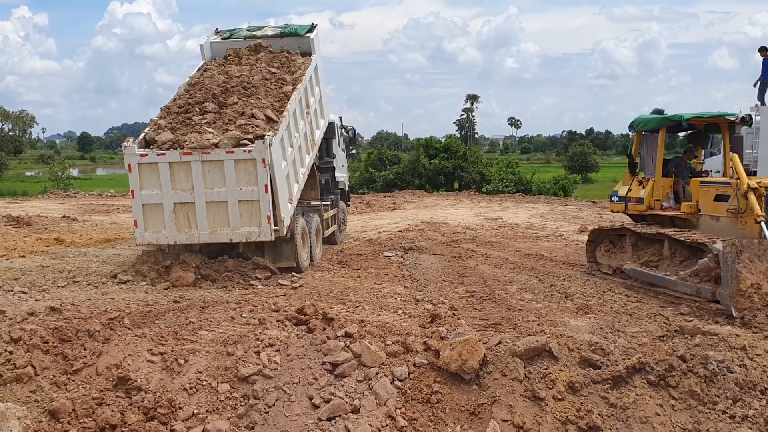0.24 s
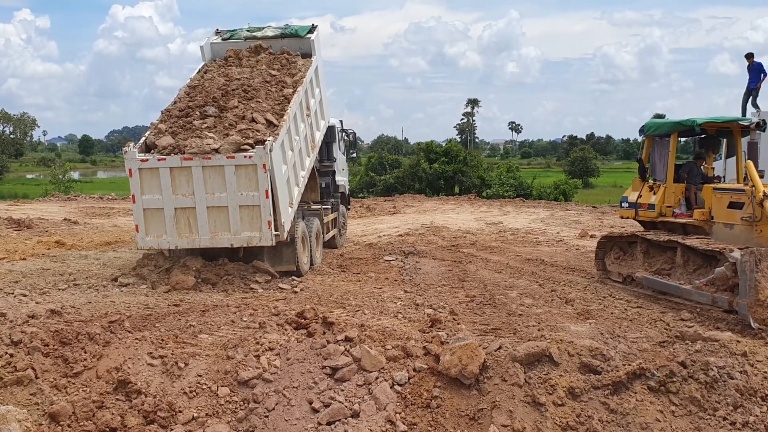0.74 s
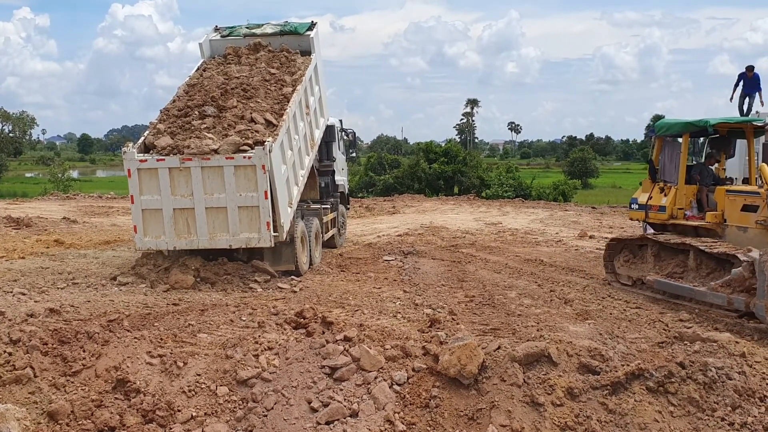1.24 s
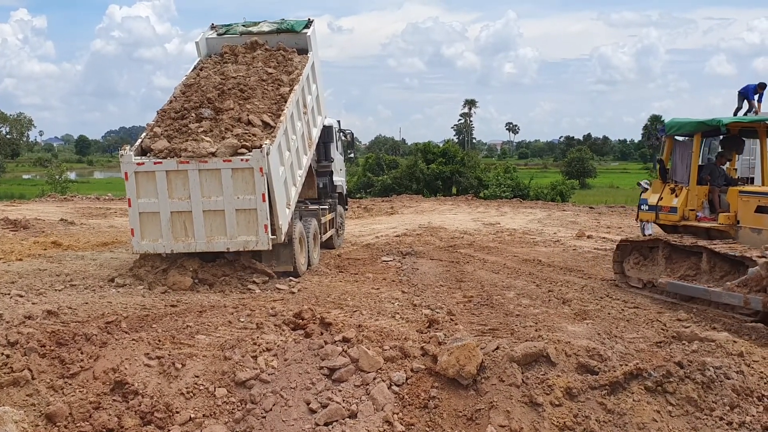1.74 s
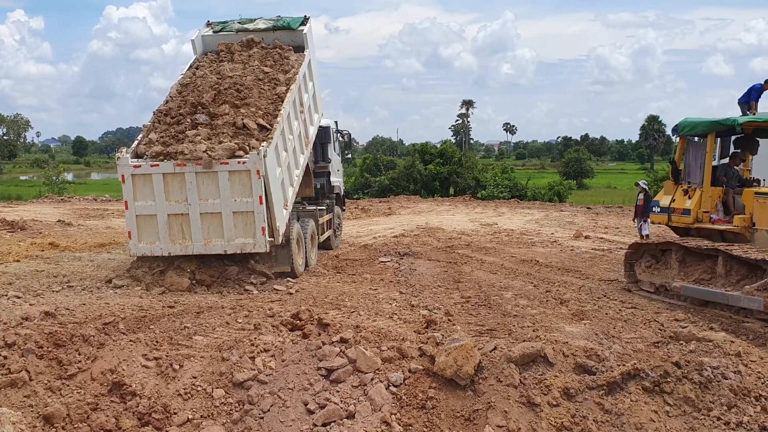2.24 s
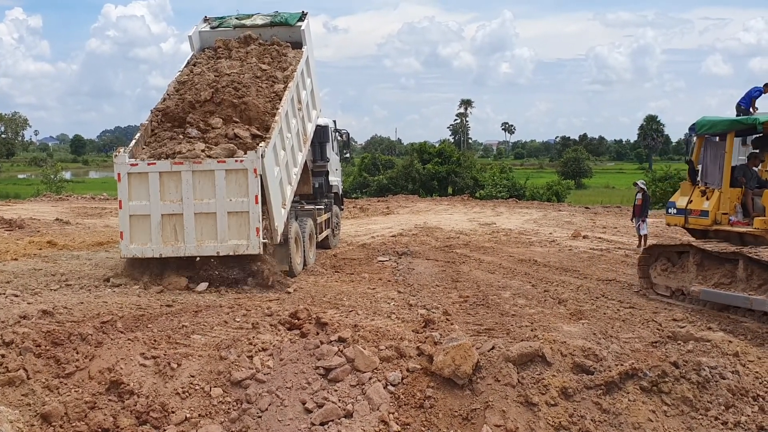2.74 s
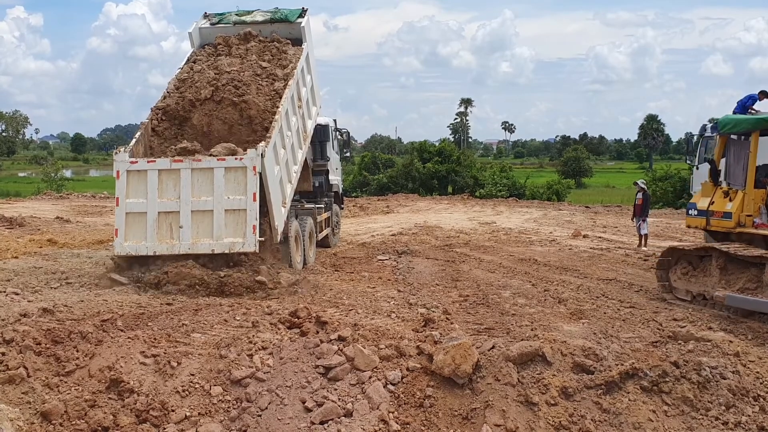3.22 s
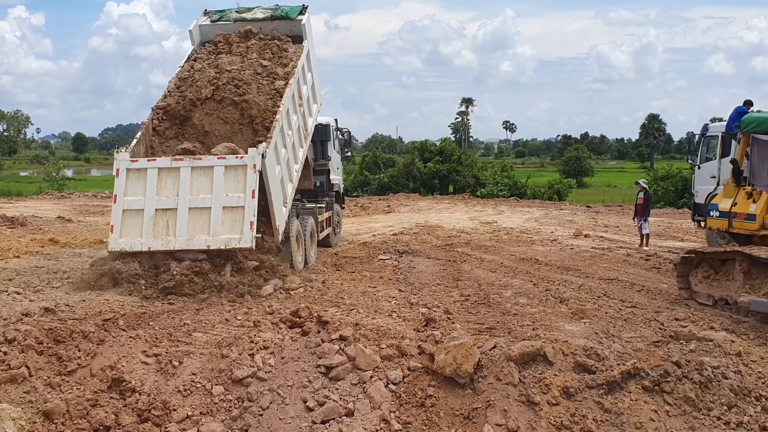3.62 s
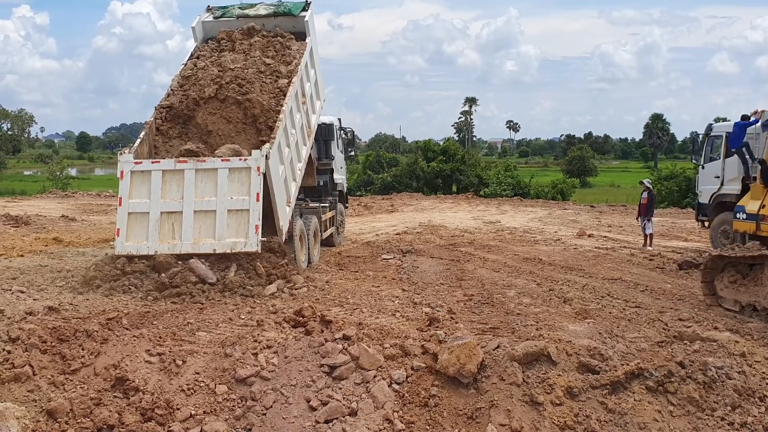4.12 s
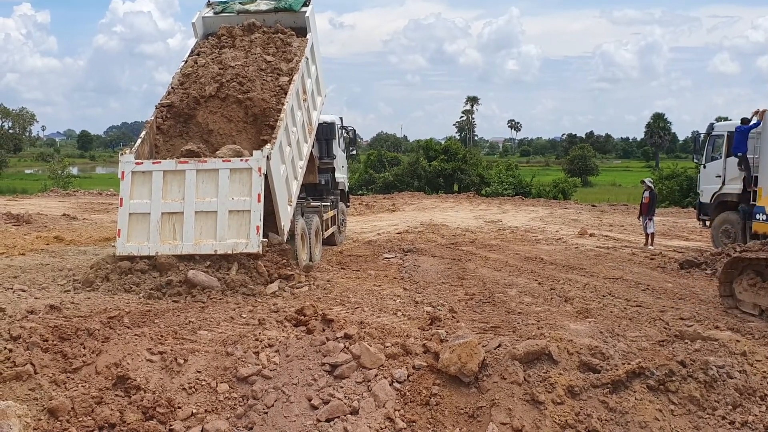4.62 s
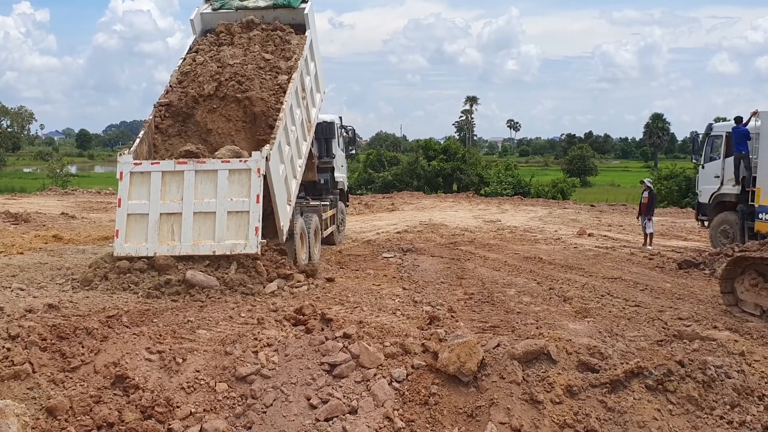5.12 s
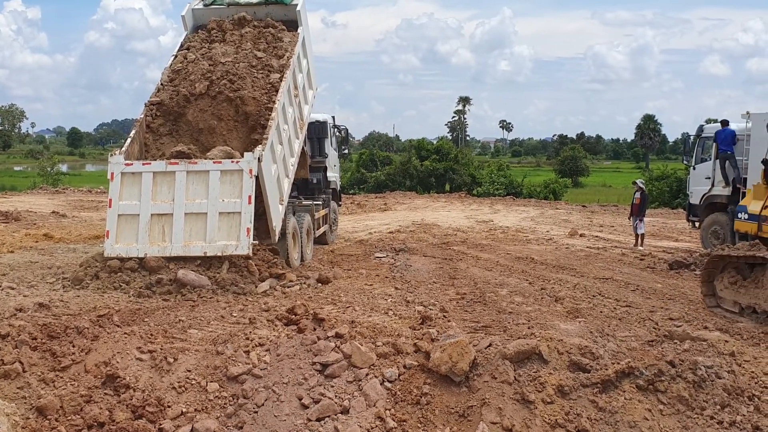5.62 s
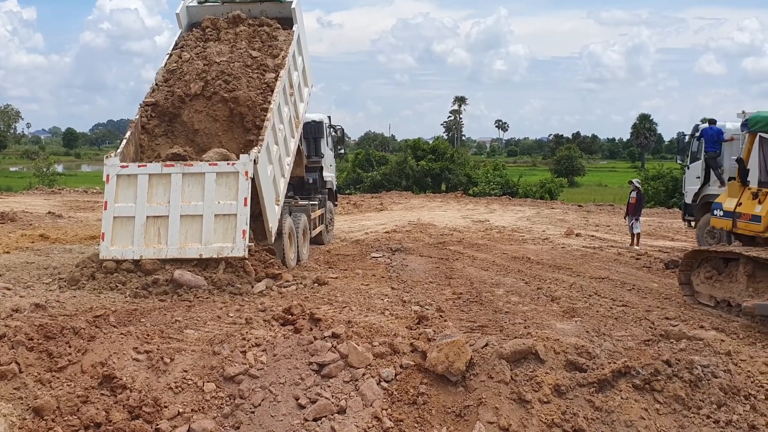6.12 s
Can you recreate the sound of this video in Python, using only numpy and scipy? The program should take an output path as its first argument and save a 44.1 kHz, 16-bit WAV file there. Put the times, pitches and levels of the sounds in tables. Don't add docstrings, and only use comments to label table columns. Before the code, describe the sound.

Heavy crawler engine throbs close by at an open earth site, sagging midway before surging back, with steel tracks clanking, squeaking and finally banging.

```python
import sys
import numpy as np
from scipy import signal
from scipy.fft import rfft, irfft, next_fast_len
from scipy.io import wavfile
from scipy.ndimage import uniform_filter1d, map_coordinates

SR = 44100
rng = np.random.default_rng(int(sys.argv[2]) if len(sys.argv) > 2 else 0)


def voltage_ratio(level):
    return 10 ** (np.asarray(level, float) / 20)


def store_wav(level_fs):
    pcm = np.round(np.clip(np.atleast_2d(level_fs), -1, 1) * 32767)
    wavfile.write(sys.argv[1], SR, pcm.T.astype(np.int16))


N = 280476
T = np.arange(N) / SR

# pitch_hz,
# level_db, waver_hz
STEADY_LINES = [(35, -41, .3), (103.6, -51.5, 0.42), (233.2, -40.5, 2.27), (384.6, -43, 4.88),
                (569, -45, 8.1), (1322, -52, 6), (1918, -54.5, 9.3), (3040, -55, 12)]
# centre_s, level_db, length_s
COAST_LOPE = [
    (3.58, -24, .08),
    (3.65, -24, .07),
    (3.73, -24, .09),
    (3.81, -25, .1),
    (3.91, -26, .1),
    (3.98, -22, .09),
    (4.145, -22, .09),
    (4.28, -23, .08),
]
# frequency_hz, density_db
SITE_RUMBLE = [(12, -58.5), (28, -9), (42, -4), (58, -3), (81, 5.5), (118, 0), (197, 1), (221, -18),
               (271, -1), (300, -3.5), (390, -48), (660, -120)]

# [resonance_hz, width_hz, gain_db]
SCRAPES = [
    (2.718, .05, -26.5, [(3000, 500, 0), (2000, 500, -1), (1100, 400, -1), (4800, 2200, -8), (9500, 5000, -16)]),
    (2.722, .034, -31, [(7000, 250, 0)]),
    (2.732, .036, -33, [(6250, 350, 0), (10150, 300, -8)]),
    (2.107, .02, -36, [(2900, 600, 0), (5500, 3000, -5)]),
    (5.98, .05, -46, [(6800, 1600, 0), (9500, 3000, -3), (11700, 150, 7)]),
    (5.937, .007, -31, [(900, 300, 0), (1650, 400, 0), (2200, 500, -2)]),
    (1.881, .004, -42, [(12000, 5000, 0)]),
    (6.117, .007, -30, [(1200, 900, 0), (2300, 1200, -1), (3400, 600, -5)]),
]
# start_s, peak_db, pitch_hz, t60_s
CLANKS = [(0.662, -29, 1250, 0.068), (0.461, -18, 1350, .05), (0.742, -19, 1320, .05),
          (0.829, -13, 875, 0.045), (1.043, -25, 1216, .05), (1.259, -24, 927, .05),
          (1.438, -25, 1094, 0.06), (1.784, -21, 1330, .05), (2.396, -19, 919, 0.052),
          (2.885, -24, 1902, 0.044), (3.25, -20, 1700, .05), (4.62, -19, 1150, 0.058),
          (1.673, -16, 1253, 0.076), (2.112, -16, 821, 0.041), (2.208, -13.5, 1200, 0.062),
          (2.588, -19, 1588, 0.16), (3.17, -13, 1238, 0.047), (3.467, -14, 1251, 0.059),
          (3.612, -16, 1220, 0.057), (3.766, -16, 920, 0.032), (4.004, -15, 980, 0.06),
          (4.233, -15, 771, 0.045), (3.686, -16, 790, 0.043), (1.014, -23, 850, .04)]
# start_s, peak_db, pitch_hz, t60_s
BANGS = [
    (5.9392, -11, 930, .04),
    (5.9388, -13, 1650, .02),
    (5.9385, -16, 2150, .015),
    (6.1175, -11, 1080, .045),
    (6.117, -10, 2200, .016),
    (6.1172, -13, 1750, .018),
    (6.116, -18, 3300, .012),
    (6.122, -16, 750, .03),
    (6.131, -15, 1075, .05),
]
# frequency_hz, width_hz, gain_db
SHOE_MODES = [(950, 420, -1), (1600, 600, -1), (2200, 550, -1), (3300, 900, -16)]

# start_s, end_s, start_hz, end_hz, level_db
SQUEALS = [(2.11, 2.18, 7900, 8050, -47), (2.127, 2.148, 8000, 8020, -40.5),
           (2.144, 2.168, 8000, 8040, -40), (2.266, 2.31, 3880, 3930, -41), (2.3, 2.325, 4050, 4150, -45),
           (2.385, 2.425, 3875, 3890, -46), (2.47, 2.535, 3930, 3950, -43.5),
           (2.74, 2.775, 7850, 8000, -49), (2.774, 2.8, 7985, 8020, -40), (2.797, 2.815, 8020, 8030, -41),
           (2.81, 2.835, 8030, 8040, -46), (4.397, 5.99, 8800, 9035, -66), (2.89, 2.93, 4000, 4000, -46),
           (3.16, 3.245, 3980, 3990, -42), (4.66, 4.765, 4000, 4028, -46), (4.775, 4.83, 3960, 3930, -44),
           (5.915, 5.945, 3875, 3870, -41), (5.658, 5.69, 7970, 7960, -46), (5.99, 6.03, 11700, 11680, -46)]
# start_s, end_s, start_hz, end_hz, level_db
GROANS = [(0.84, 1.26, 324, 310, -34), (2.44, 2.7, 240, 247, -28.5), (3.6, 3.7, 85, 118, -29),
          (3.82, 3.95, 105, 88, -28.5), (5.2, 5.78, 280, 298, -35), (1.58, 2.08, 337, 315, -32),
          (3.69, 3.8, 296, 302, -33), (2.38, 2.72, 327.2, 340, -28), (2.93, 3.17, 582, 640, -33.5),
          (2.74, 2.88, 333, 329, -28), (3.45, 3.61, 356, 332, -27), (3.95, 4.13, 281, 258, -28),
          (4.5, 4.71, 298, 301, -30), (4.757, 4.9, 272, 270, -28), (5.25, 6.404, 377, 390, -36)]
# start_s, end_s, start_hz, end_hz, level_db
PINGS = [(3.522, 3.547, 1320, 1320, -29.5), (4.165, 4.214, 1325, 1320, -37), (4.235, 4.27, 1180, 1210, -36),
         (4.495, 4.543, 1170, 1191, -38), (4.589, 4.633, 1310, 1320, -36), (4.732, 4.76, 1330, 1323, -43),
         (4.888, 4.93, 1830, 1817, -41), (6.003, 6.05, 1320, 1330, -36.5), (6.058, 6.09, 1300, 1320, -37),
         (6.114, 6.15, 1325, 1334, -43), (6.135, 6.175, 1900, 1880, -39), (6.24, 6.29, 1330, 1300, -37),
         (6.291, 6.34, 1860, 1880, -41), (1.52, 1.554, 1320, 1320, -32)]
# time_s, pitch_hz, level_db
DRAGS = [
    [(4.162, 3987, -58), (4.176, 3987, -44), (4.25, 3957, -43), (4.262, 4085, -46), (4.294, 3998, -37),
     (4.308, 4000, -46), (4.33, 3980, -38), (4.4, 4030, -50), (4.42, 4030, -60)],
    [(4.44, 4005, -58), (4.465, 4015, -50), (4.485, 4008, -38), (4.545, 3986, -42), (4.56, 3975, -52),
     (4.599, 3995, -40), (4.625, 3993, -47), (4.64, 3993, -58)],
    [(5.696, 3880, -58), (5.708, 3874, -39), (5.768, 3858, -34), (5.78, 3834, -38), (5.846, 3844, -40),
     (5.86, 3830, -56)],
    [(5.968, 3880, -52), (5.981, 3885, -32), (6.059, 3895, -35), (6.077, 3898, -44), (6.133, 3928, -37),
     (6.15, 3885, -35), (6.173, 3859, -31), (6.195, 3880, -37), (6.222, 3903, -44)],
    [(6.218, 3900, -46), (6.232, 3887, -36), (6.262, 3878, -36), (6.282, 3852, -44), (6.292, 3817, -35),
     (6.336, 3835, -32), (6.37, 3842, -35)],
]

# level_db, lost_when_away_db, lost_without_fuel_db,
# rise_db_per_hz of firing rate, share_of_jolt
LAYERS = dict(roar=(-25, 1.5, 0, 0.1448, 0.1037), knock=(-31.5, 6.5, -2.5, 0.25, -0.1),
          fan=(-34, 0.5, 2, 0.0557, 0), rattle=(-41, 8.5, 0.5, 0.07, 0.43), air=(-45, 3.5, 1.5, 0, 0.41))
# time_s, share (0-1)
AWAY = [(0, 0), (2.45, 0.2), (2.85, 0.45), (3.4, 0.65), (3.65, 0.99), (4.7, 0.35), (5.0, 0.4), (5.35, 0.76),
        (6.36, 0.82)]
# centre_s, jolt_db, length_s
JOLTS = [(.04, -9, 0.12), (.2, 3.5, 0.22), (.52, 6, 0.2), (.78, 6, 0.18), (1.09, 8, 0.25), (1.3, 6, 0.26),
         (1.6, 5, 0.23), (1.76, 10, 0.12), (1.93, 5, 0.15), (2.15, 8, .1), (2.35, 8, 0.36), (2.62, 3, 0.14),
         (3.03, 8, 0.073), (3.2, -2, .12), (3.38, 4, 0.13), (4.0, 5, .13), (4.17, 1, 0.077),
         (4.3, 5, 0.095), (4.46, 6, .15), (4.92, 5, 0.15), (5.04, 9, 0.067), (5.12, 8, 0.16),
         (5.52, 7, 0.27), (5.68, 6.5, 0.39), (6.0, 15, 0.074), (6.2, 7, 0.15)]
# centre_s, swell_db, length_s
SURGES = [
    (.4, 1.7, 0.54),
    (1.75, 1.2, 0.44),
    (2.5, 2.2, 0.35),
    (2.8, 2, 0.2),
    (3.48, 0.9, 0.28),
    (4.02, 1.25, 0.11),
    (4.7, 1.64, 0.75),
    (6.08, 1.8, 0.53),
]
# centre_s, swell_db, length_s
GEAR_STRAIN = [
    (3.38, 19, .6),
    (4.2, 17, .45),
    (4.5, 21, .2),
    (4.68, 17, .35),
]
# frequency_hz, density_db
ROAR = [(120, -18), (200, -2), (280, -9.5), (323, -3.5), (498, -7), (567, -7.5), (631, -10), (1100, -17),
        (1430, -21), (1750, -25.5), (2420, -120)]
CASING = [(600, -34), (1000, -6), (1150, -3), (1330, 0), (1390, -2), (1450, -7), (1720, -7), (1810, -3),
          (1930, -1), (2050, -2), (2150, -10), (2400, -22), (4000, -80)]
FAN = [(1290, -28.5), (2200, -1), (2330, -3), (2550, -1.5), (3100, -3.5), (3330, -6), (4050, -8),
       (5030, -15), (5300, -17), (6890, -46), (11700, -120)]
LINKS = [(2940, -55), (5000, -39), (5410, -4), (5870, 0.5), (6480, 2), (6930, 2.5), (8600, -17.5),
         (11200, -44), (18900, -120)]
DUST = [(5000, -30), (7600, -5), (9000, -2.5), (10500, -3), (11400, -4), (11900, -1.5), (13000, -2),
        (14000, -5), (16500, -6)]
HISS = [(9000, -60), (11500, -20), (12000, 0), (14000, 0), (15500, -2), (17000, -6)]
# frequency_hz, width_hz, gain_db
PANELS = [(1188, 56, 0.5), (1320, 33, 2), (1883, 20, 1.5), (1966, 31, 2)]

# time_s, firing_hz, load_db
ENGINE = [(0, 78.9, -9.5), (.2, 79.94, -8), (.56, 79.64, -8.8), (1.12, 79.03, -9), (1.6, 80.68, -9),
          (1.96, 78.2, -9), (2.5, 83.03, -9.5), (2.66, 82.3, -8.5), (3.2, 87.94, -9.5), (3.46, 86.8, -11),
          (3.6, 84.1, -11), (4.3, 56.5, -19), (4.4, 56.1, -10), (4.58, 61.93, -8), (4.84, 68.32, -6.5),
          (5.1, 68.77, -6.5), (5.62, 74.48, -9.5), (6.36, 77.43, -10.5)]
COAST_DB = [-34, -32, -14, -8]
WAVER_DB = [.3, .5, 1.3, 2]
# frequency_hz, gain_db
STACK = [(92, 0), (112, -33), (122, -29), (132, -22), (142, -15), (160, -10), (186, -9), (205, -19)]
STACK_TOP = [(205, 0), (222, -4), (240, -3.5), (255, -11), (300, -8), (340, -10)]
# time_s, gain_db
BARK = [(0, -2.5), (1.2, -2.5), (1.55, 2), (3.1, 0.5), (3.4, 4), (4.4, -1), (4.6, -2.5), (4.85, 0),
        (5.3, 1), (6.36, 3)]
# time_s, late_ms
DETOUR = [(0, 1.6), (1.0, 1.2), (2.6, 1.4), (3.5, .9), (4.4, -.6), (5.6, -.55), (6.36, 0)]
# sixths_of_firing_rate, level_db under
UNEVEN = [(7, -28), (8, -21), (10, -22), (14, -18.5), (15, -30), (16, -25), (21, -33), (30, -34), (36, -37),
          (42, -35)]
# frequency_hz, gain_db
PIPE = [(30, -7), (100, -11), (120, -4.5), (155, -4), (185, 1), (205, -14), (300, 3.5), (500, 2)]
# sixths_of_firing_rate, level_db
PUMPING = [(3, -39), (4, -38), (5, -39)]

# frequency_hz, likeness (0-1)
ALIKE = [(30, .995), (300, .975), (600, .9), (1100, .8), (1850, .62), (3300, .55), (5000, .4), (8000, .3),
         (15000, .3)]
# frequency_hz, lead_rad
LEAD = [(20, 0.16), (200, 0.26), (400, 0.56), (500, 1.48), (710, 0.62), (1050, 1.71), (1260, 1.6),
        (1530, 2.1), (1850, 0.85), (2700, 4.6), (4000, 7.46), (4800, 4.9), (7000, 7.4), (10000, 8.5),
        (15000, 29.3)]
# frequency_hz, level_db
TILT = [(60, 0.5), (110, -1), (200, 0), (380, 0), (700, -2.0), (1290, -3), (2380, 0.5), (4400, -9),
        (8120, -1.5), (15000, 0)]

PULL_S = 4.371


def unit(x):
    return x / np.sqrt(np.mean(x ** 2) + 1e-20)


def along(points, hz):
    f, v = np.transpose(points)
    return np.interp(np.log(hz + 1), np.log(f + 1), v)


def curves(rows):
    s, *cols = np.transpose(rows)
    return [np.interp(T, s, c) for c in cols]


def wobble(rate):
    knots = rng.standard_normal(int(N * rate / SR) + 4)
    return map_coordinates(knots, [T * rate])


def humps(rows):
    return sum(height * np.cos(np.pi * np.clip((T - s) / length, -.5, .5)) ** 2
               for s, height, length in rows)


def filtered(x, response, carry=0):
    edge = 4096
    m = next_fast_len(N + 3 * edge)
    before = 2 * x[..., :1] - x[..., edge:0:-1]
    after = 2 * x[..., -1:] - x[..., -2:-edge - 2:-1]
    wide = np.concatenate([carry * before, x, carry * after], axis=-1)
    return irfft(rfft(wide, m) * response(np.fft.rfftfreq(m, 1 / SR)), m)[..., edge:edge + N]


def resonances(peaks):
    return lambda f: sum((-1) ** k * voltage_ratio(db) * 1j * f * w / (c * c - f * f + 1j * f * w)
                         for k, (c, w, db) in enumerate(peaks))


def shaped(spectrum):
    return lambda hz: voltage_ratio(along(spectrum, hz))


def rush(colour, patchy_db):
    z = signal.stft(rng.standard_normal((2, N)), nperseg=512)[2]
    field = uniform_filter1d(rng.standard_normal(z.shape[1:]), size=5, axis=0)
    field = uniform_filter1d(field, size=10, axis=1)
    pair = signal.istft(z * voltage_ratio(patchy_db * unit(field)), nperseg=512)[1][:, :N]

    def mid_side(hz):
        angle = np.arccos(np.clip(along(ALIKE, hz), 0, 1)) / 2
        return colour(hz) * np.array([np.cos(angle), np.sin(angle)])

    mid, side = filtered(pair, mid_side)
    return unit(np.array([mid + side, mid - side]))


def drones():
    fading_db = 2.5
    lines = 0
    for hz, db, waver_hz in STEADY_LINES:
        level = voltage_ratio(db + fading_db * wobble(6.2))
        turn = 2 * np.pi * np.cumsum(hz + waver_hz * wobble(9.8)) / SR
        lines = lines + np.sqrt(2) * level * np.cos(turn)
    beats = humps([(s, voltage_ratio(db), length) for s, db, length in COAST_LOPE])
    lope = np.sqrt(2) * beats * np.cos(2 * np.pi * np.cumsum(78 + 3 * wobble(8.3)) / SR)
    rumble = voltage_ratio(-27 + 0.4 * wobble(16)) * rush(shaped(SITE_RUMBLE), patchy_db=-1.5)
    return lines + lope + rumble


def scrapes():
    out = 0
    for start, length, db, peaks in SCRAPES:
        hump = np.abs(np.sin(np.pi * np.clip((T - start) / length, 0, 1))) ** 0.1
        response = resonances(peaks)
        out = out + voltage_ratio(db) * hump * rush(lambda hz: response(hz) ** 2, patchy_db=1.0)
    return out


def clanks():
    cracks, rings, t = np.zeros(N + SR), np.zeros(N + SR), T[:SR // 5]
    for s, db, hz, t60 in CLANKS + BANGS:
        at = round(s * SR)
        decay_db = -60 * t / t60
        cracks[at] += voltage_ratio(db + 19)
        cracks[at:][:len(t)] += voltage_ratio(db - 3 + decay_db) * rng.standard_normal(len(t))
        rings[at:][:len(t)] += voltage_ratio(db - 7.0 + decay_db) * np.sin(2 * np.pi * hz * t)
    return filtered(cracks[:N], resonances(SHOE_MODES)) + rings[:N]


def squeals():
    out = np.zeros(N)
    flutter_db, drift = 1.6, wobble(50)
    flutter, sway = wobble(83), wobble(12)
    for start, end, hz0, hz1, db in SQUEALS + GROANS + PINGS:
        edge = np.clip(np.minimum((T - start) / 0.006, (end - T) / 0.016), 0, 1)
        hz = np.interp(T, [start, end], [hz0, hz1]) * (1 + 0.0015 * drift)
        turn = 2 * np.pi * np.cumsum(hz) / SR
        tone = np.sin(turn)
        tone += voltage_ratio(-22.5) * np.sin(2 * turn) * (hz0 < SR / 5)
        tone += voltage_ratio(-25) * np.sin(3 * turn) * (hz0 < SR / 8)
        unsteady = flutter if hz0 > SR / 40 else sway
        out += np.sqrt(2) * edge * voltage_ratio(db + flutter_db * unsteady) * tone
    return out


def drags():
    out, flutter, drift = np.zeros(N), wobble(90), wobble(50)
    flutter_db = 1.4
    for rows in DRAGS:
        hz, db = curves(rows)
        turn = 2 * np.pi * np.cumsum(hz * (1 + 0.0014 * drift)) / SR
        tone = np.sin(turn) + voltage_ratio(-24.0) * np.sin(2 * turn) + voltage_ratio(-27) * np.sin(3 * turn)
        sounding = (T > rows[0][0]) * (T < rows[-1][0])
        out += np.sqrt(2) * sounding * voltage_ratio(db + flutter_db * flutter) * tone
    return out


def layer_levels(firing_hz, fuel, jolt_db):
    away, = curves(AWAY)
    lag_s = 0.36
    slack = 1 - uniform_filter1d(fuel, int(lag_s * SR))
    return {name: db - far_db * away - idle_db * slack + rev_db * (firing_hz - 80) + share * jolt_db
            for name, (db, far_db, idle_db, rev_db, share) in LAYERS.items()}


def gas_roar(level_db):
    return voltage_ratio(level_db + humps(SURGES)) * rush(shaped(ROAR), patchy_db=0.28)


def block_knock(level_db):
    block = rush(shaped(CASING), patchy_db=2.0)
    covers = voltage_ratio(-3.5) * rush(resonances(PANELS), patchy_db=2.5)
    return voltage_ratio(level_db + 0.094 * humps(SURGES)) * (block + covers)


def gear_whine(turn, fuel):
    teeth = 67 / 3 * turn
    db = -57 - 3 * (1 - fuel) + humps(GEAR_STRAIN) + 1.4 * wobble(10.0)
    return np.sqrt(2) * voltage_ratio(db) * np.sin(teeth + 0.24 * wobble(35))


def fan(level_db, shake):
    return voltage_ratio(level_db + 0.17 * shake) * rush(shaped(FAN), patchy_db=1.0)


def track_rattle(level_db, shake):
    return voltage_ratio(level_db + 0.51 * shake) * rush(shaped(LINKS), patchy_db=2.0)


def rushing_air(level_db, fuel, jolt_db, shake):
    air = voltage_ratio(level_db + 0.85 * shake) * rush(shaped(DUST), patchy_db=1.3)
    hiss_db = -56 + 5 * fuel * (T > PULL_S) + 0.3 * jolt_db + 0.7 * shake
    return air + voltage_ratio(hiss_db) * rush(shaped(HISS), patchy_db=1)


def machinery(turn, firing_hz, fuel):
    jolt_db = humps(JOLTS)
    level = layer_levels(firing_hz, fuel, jolt_db)
    shake = wobble(21.79)
    engine = gas_roar(level["roar"]) + block_knock(level["knock"]) + gear_whine(turn, fuel)
    moving = fan(level["fan"], shake) + track_rattle(level["rattle"], shake)
    return engine + moving + rushing_air(level["air"], fuel, jolt_db, shake)


def throttle():
    lift_s, lift_takes_s, pull_takes_s = 3.5, .095, .042
    return np.clip(np.maximum(1 - (T - lift_s) / lift_takes_s, (T - PULL_S) / pull_takes_s), 0, 1)


def firing_orders(firing_hz, load_db, fuel):
    bark_db, = curves(BARK)
    levels = []
    for k, left_db, waver_db in zip((1, 2, 3, 4), COAST_DB, WAVER_DB):
        stack_db = along(STACK, k * firing_hz) + along(STACK_TOP, k * firing_hz) + (k > 1) * bark_db
        fuel_db = 20 * np.log10(np.maximum(fuel, voltage_ratio(left_db)))
        levels.append(load_db + stack_db + fuel_db + waver_db * wobble(5.6))
    return levels


def exhaust(firing_hz, turn, order_db):
    def tone(k, db, start):
        return np.sqrt(2) * voltage_ratio(db) * np.cos(k * turn + start)

    late = 2 * np.pi * firing_hz * curves(DETOUR)[0] / 1000
    out = 0
    for k, db in zip((1, 2, 3, 4), order_db):
        out = out + tone(k, db + 0.51 * wobble(13), (k > 1) * (k - 2 - k * late))
    for k, db in PUMPING:
        rev_db = .3 * (firing_hz - 80)
        out = out + tone(k / 6, db + rev_db + 2.3 * wobble(2.5), rng.uniform(0, 2 * np.pi))
    for k, db in UNEVEN:
        pipe_db = along(PIPE, firing_hz * k / 6)
        out = out + tone(k / 6, order_db[0] + db + pipe_db + 1.1 * wobble(4.1), rng.uniform(0, 2 * np.pi))
    return out


def scene():
    firing_hz, load_db = curves(ENGINE)
    turn = 2 * np.pi * np.cumsum(firing_hz) / SR
    fuel = throttle()
    boom = exhaust(firing_hz, turn, firing_orders(firing_hz, load_db, fuel))
    dozer = boom + machinery(turn, firing_hz, fuel)
    return dozer + drones() + squeals() + drags() + clanks() + scrapes()


def low_pass(x):
    return signal.sosfilt(signal.butter(12, 15730, fs=SR, output="sos"), x)


def record(dry):
    half = np.array([[-.5], [.5]])

    def ports(hz):
        return np.exp(1j * half * along(LEAD, hz)) * voltage_ratio(-half * along(TILT, hz))

    x = filtered(dry, ports, carry=0.44)
    limit, knee = 1.06, 8
    x = x / (1 + np.abs(x / limit) ** knee) ** (1 / knee)
    return low_pass(x)


dry = scene()
out = record(dry)
store_wav(out)
```